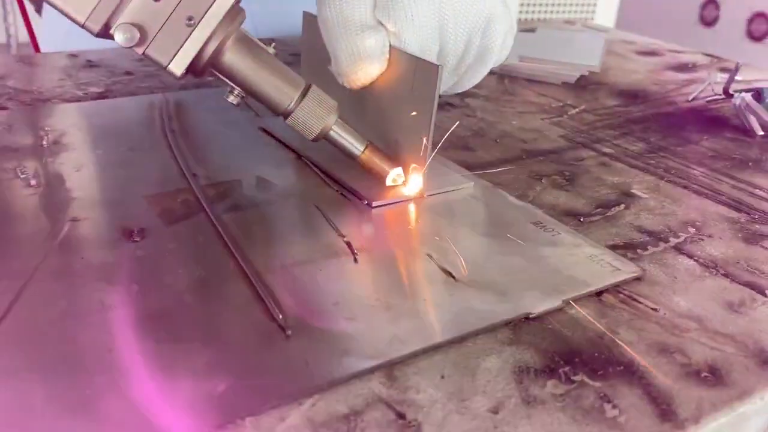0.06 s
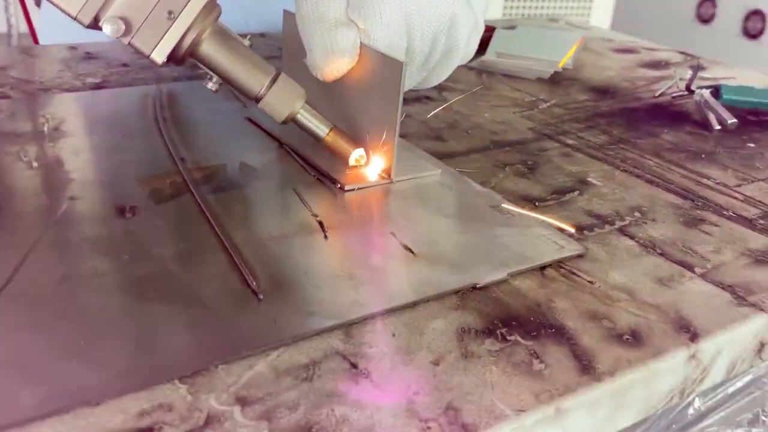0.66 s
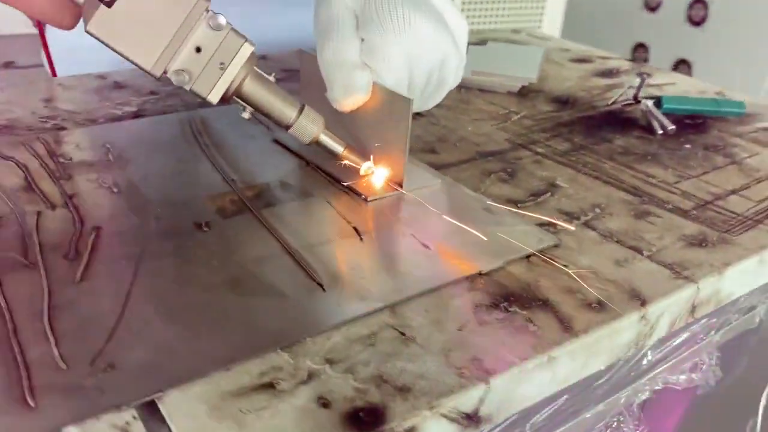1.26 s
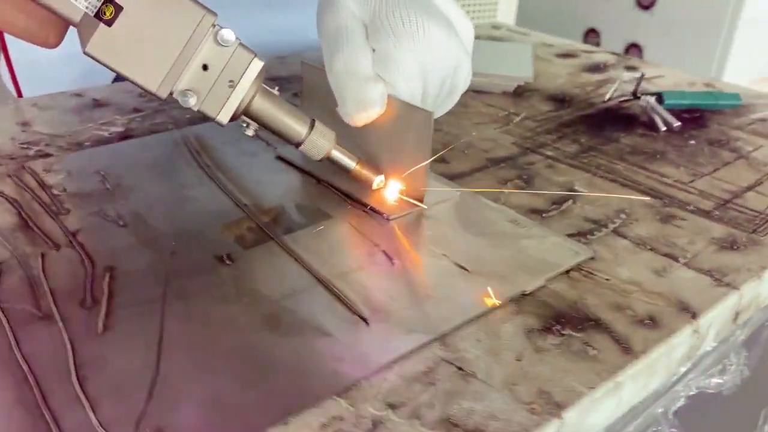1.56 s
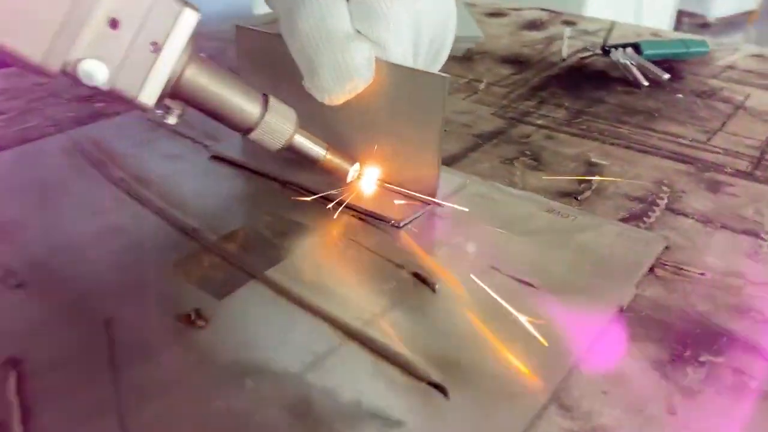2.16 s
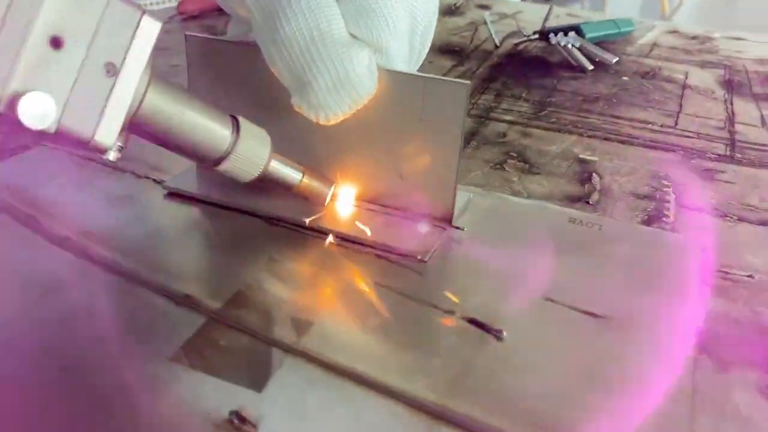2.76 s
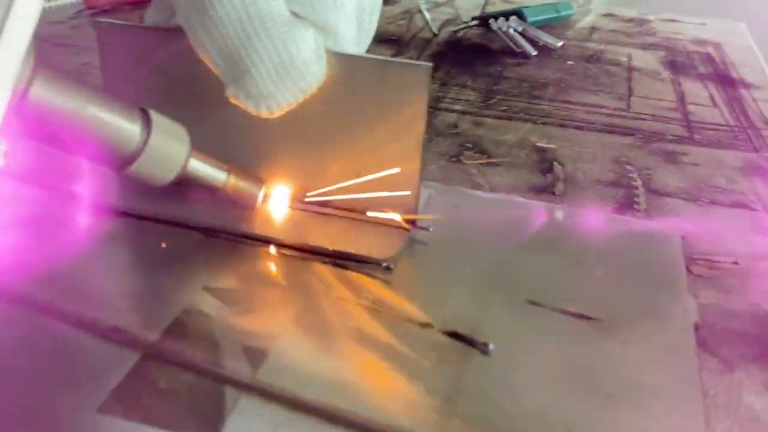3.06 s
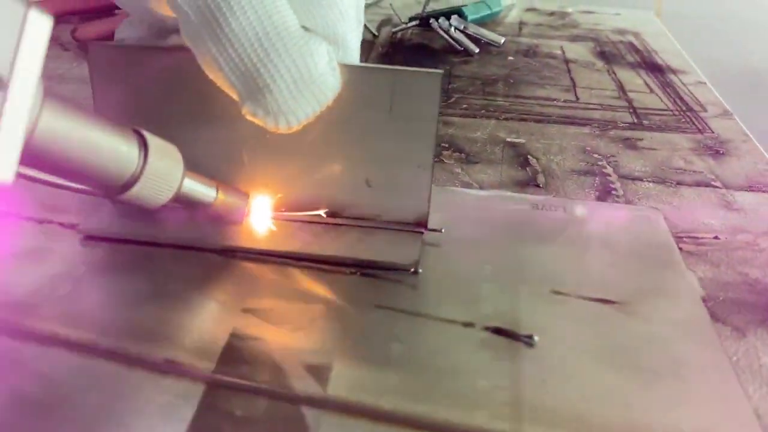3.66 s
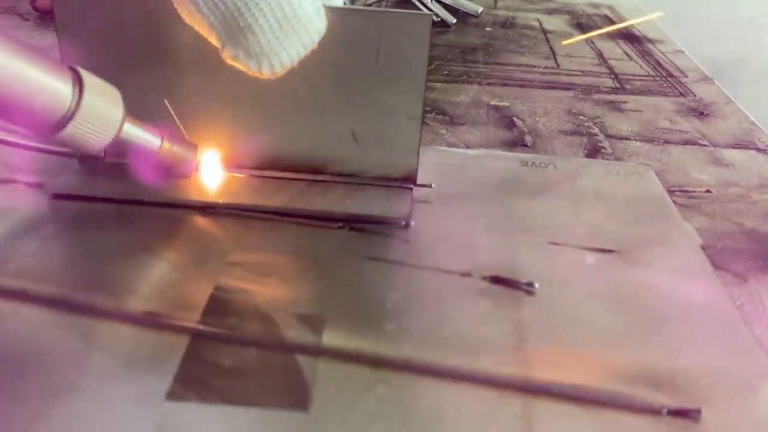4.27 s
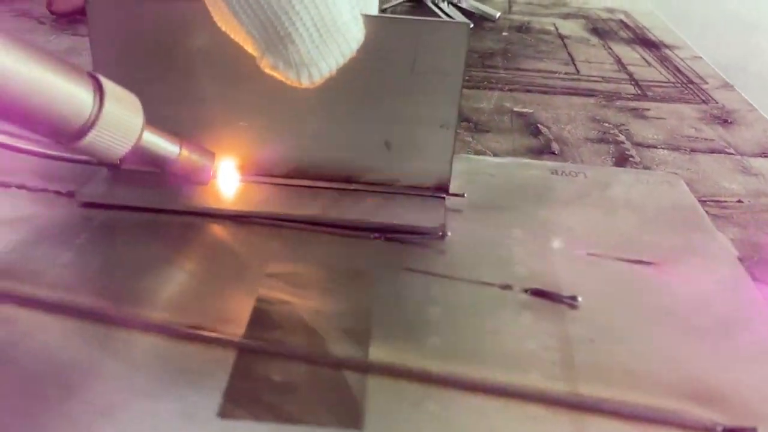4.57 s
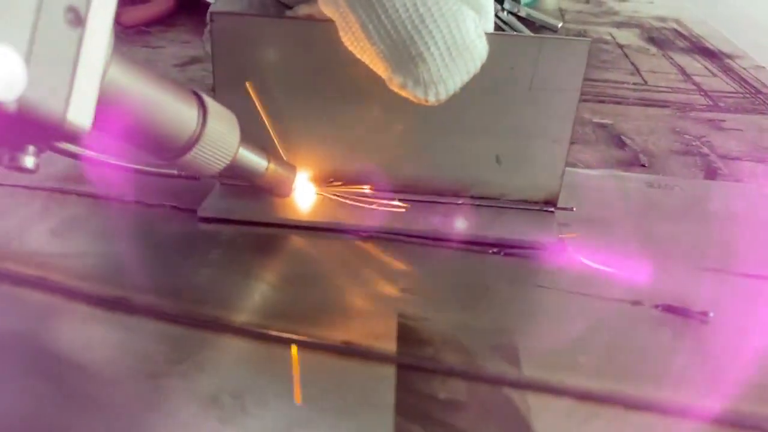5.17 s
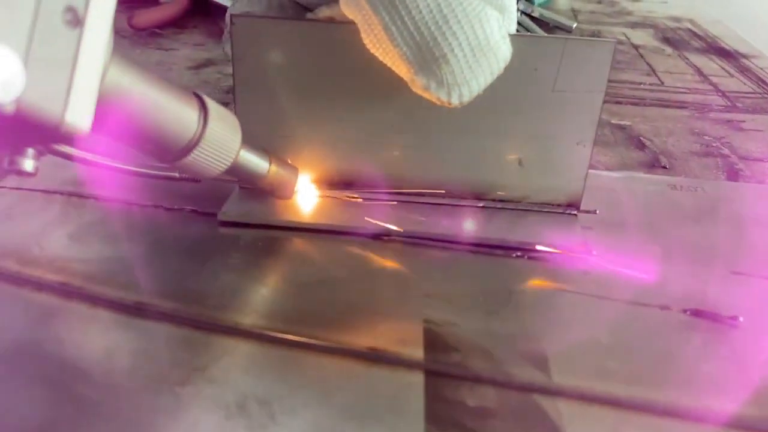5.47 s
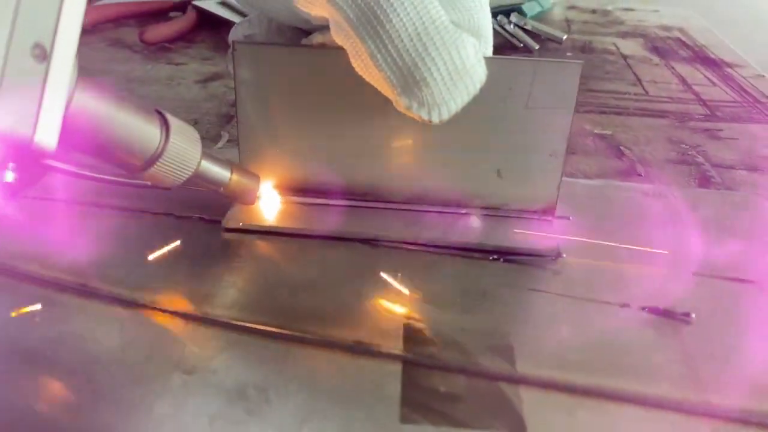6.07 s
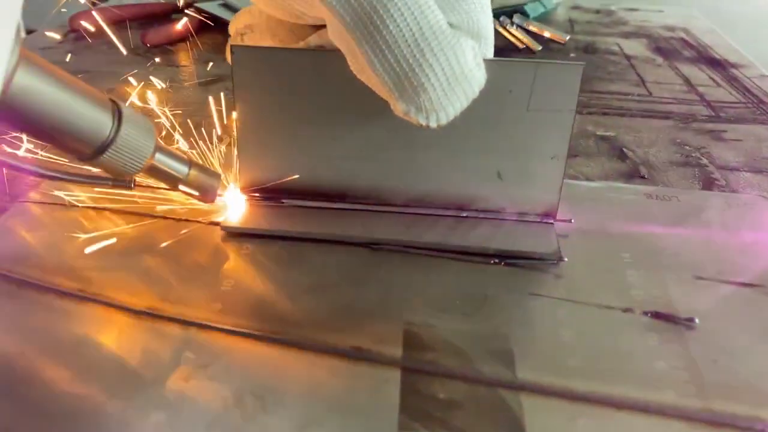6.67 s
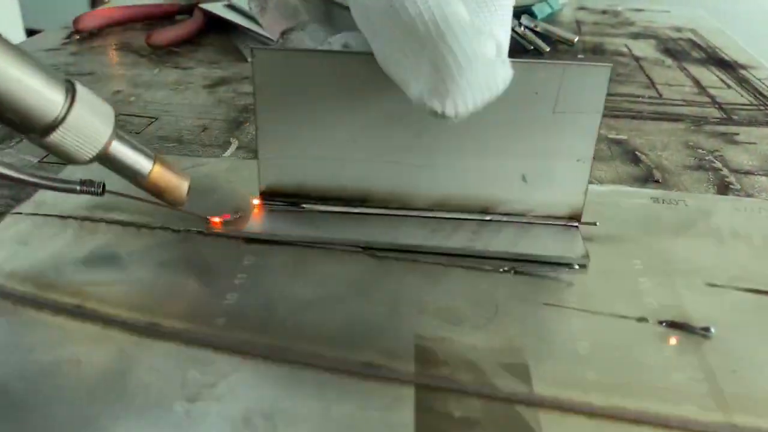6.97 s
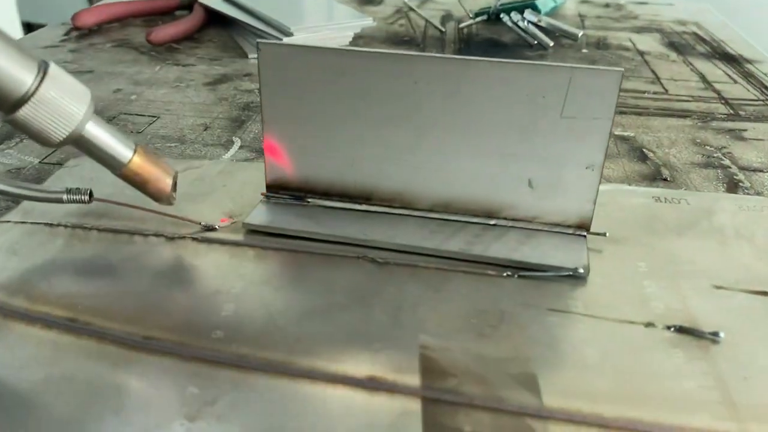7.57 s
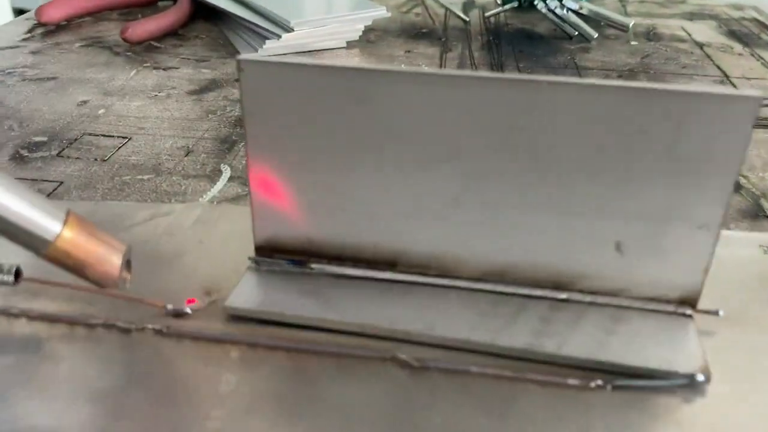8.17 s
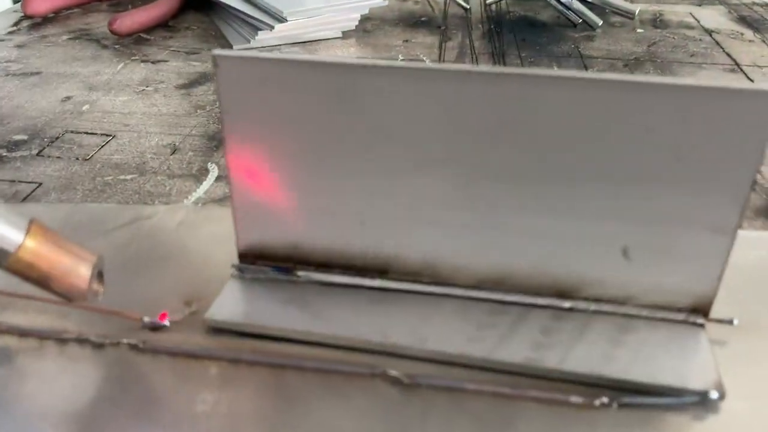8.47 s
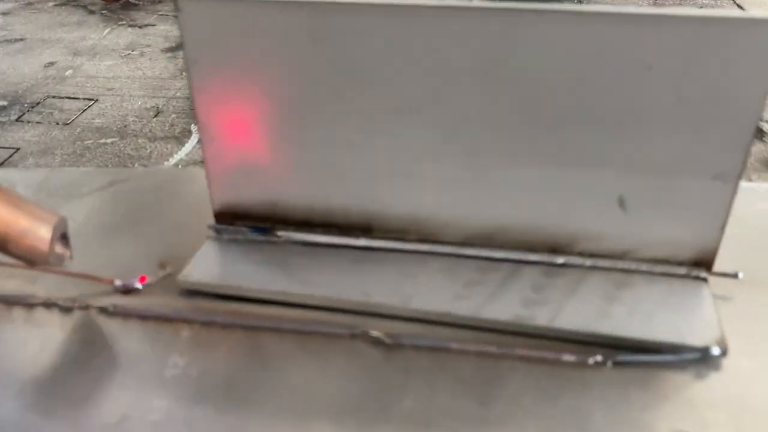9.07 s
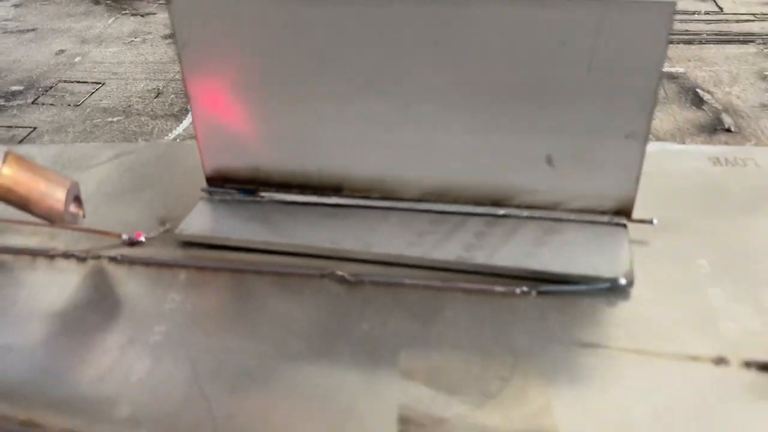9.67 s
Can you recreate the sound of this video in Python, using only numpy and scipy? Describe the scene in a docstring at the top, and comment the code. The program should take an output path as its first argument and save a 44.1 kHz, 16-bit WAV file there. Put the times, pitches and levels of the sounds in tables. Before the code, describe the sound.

From the first moment a handheld laser torch is welding a steel joint, close to the microphone and a little to the left. It gives a high, piercing whine with a fast, raspy buzz and a bright sizzling hiss, all wavering slightly as the hand moves. A drop of melt pops right at the start, and two more pop at about 6.6 and 6.9 seconds. At 7 seconds the welding cuts off and the trigger clacks back with a tiny rattle. Shielding gas hisses on for about half a second and dies away. From around 8 seconds the resting welder gives a faint, very high whistle until the end, near 10 seconds. Throughout, workshop fans and motors make a low rumble and hum, and a machine further off thuds dully about every 1.3 seconds. This background is most exposed once the welding stops.

```python
"""A handheld laser torch welds a steel corner joint on a metal table. The laser fires 3500 times a
second and sweeps across the seam: the vapour plume whines, hisses and buzzes, and a few drops of melt pop.
The beam stops at 7 s, the trigger clacks back and the shielding gas runs on for half a second.
The resting welder whistles faintly; workshop machines rumble and thump throughout."""
import sys
import numpy as np
from scipy import signal
from scipy.fft import rfft, irfft, next_fast_len
from scipy.io import wavfile
from scipy.ndimage import map_coordinates

SR = 44100
rng = np.random.default_rng(int(sys.argv[2]) if len(sys.argv) > 2 else 0)


def persist_wave(psi):
    """Save psi, clipped to +-1, as 16-bit WAV."""
    counts = np.round(np.clip(psi, -1, 1) * 32767).astype(np.int16)
    wavfile.write(sys.argv[1], SR, np.atleast_2d(counts).T)


N = 437031

PULSE_HZ, SWEEP_HZ = 3500.1, 107.86
SEAM_END_S, BEAM_OFF_S = 6.89, 7.0
EXIT_CYCLES = 0.1708  # where in each sweep the beam leaves the joint

# Each row: time in seconds, level of the weaker half sweep in dB. It rises as both plates get covered.
AIM = [(0, -11), (1.3, -7.5), (2.5, -6), (3.5, -1.5), (4.5, -2.5), (5.5, 4.5), (7, 7.5)]
# Harmonics 1 to 4 as the hand moves. Each row: time in seconds, level in dB.
FIRST_LEVEL = [(0.0, -46), (0.06, -44), (0.17, -58), (0.23, -49), (1.01, -53.5), (2.21, -47.5), (2.99, -53),
               (3.19, -49), (4.65, -45.5), (5.83, -45.5), (6.71, -51.5), (6.98, -57)]
SECOND_LEVEL = [(0.0, -32), (0.17, -38.5), (0.82, -40), (1.03, -44.5), (1.34, -38.5), (1.67, -47),
                (2.23, -34), (2.97, -35.5), (3.6, -51), (3.98, -44), (4.12, -60), (4.7, -51), (5.31, -38),
                (5.99, -37.5), (6.67, -44), (6.98, -54)]
THIRD_LEVEL = [(0.0, -37.5), (0.76, -47), (0.97, -33.5), (1.75, -34), (2.16, -30.5), (2.43, -36.5),
               (2.76, -36.5), (3.52, -37.5), (4.43, -31.5), (5.21, -35.5), (5.58, -34.5), (6.55, -37),
               (6.75, -42), (6.78, -38), (6.92, -40.5), (6.98, -47)]
FOURTH_LEVEL = [(0.0, -32.5), (0.82, -40.5), (1.2, -33.5), (1.96, -39), (2.08, -34.5), (2.57, -35),
                (2.62, -28), (3.24, -36), (3.54, -32.5), (4.37, -35), (4.43, -33), (4.94, -38), (5.85, -30),
                (5.95, -44), (6.08, -34), (6.78, -45), (6.88, -34), (6.98, -48)]
# Each row: a harmonic's gain in dB, left-right pan in dB, pan in dB per dB of aim, reflection in dB.
HARMONIC_MIX = [(0, 24.5, 2, -53), (0, 2.5, 1, -48.5), (0, 0, 0, -46), (0, 0.5, 0, -48.5)]
# Each row: a harmonic's phase lag in the joint in radians, phase lean in radians, then as shares of
# the boiling in the joint: floor, rebound, second plate, extra on that plate at full aim.
HARMONIC_BOILING = [(.4, .45, .07, .03, -.12, .22), (.45, .05, .06, .18, .02, .24),
                    (.8, -.2, .06, .32, .24, .14), (.55, -.15, .13, .3, .6, .02)]


def whine(flutter_db=0.05, jitter_rad=0.14, kick_rad=0.26, roam_rad=0.15, early_cycles=0.017):
    """Every laser pulse puffs the plume; the sweep's abrupt edges put wide sidebands on each harmonic."""
    aim_db, = curves(AIM)
    _, stay, _ = curves(BUZZ_PATH)
    # metal boils hard in the joint, rebounds, sputters on the second plate, simmers on the way back
    rebound = lobe(0.27, 0.083)
    sputter = lobe(0.6, 0.19) * amp(wobble(400))
    simmer = 0.33 * lobe(0.81, 0.14)
    flutter = amp(flutter_db * wobble(130))
    tremble = jitter_rad * wobble(260)
    edge_kick = kick_rad * dwell(EXIT_CYCLES, 0.068, rise=0.018, fall=0.033)
    swing = np.sin(2 * np.pi * sweep())
    levels = FIRST_LEVEL, SECOND_LEVEL, THIRD_LEVEL, FOURTH_LEVEL
    out = np.zeros((2, N))
    for k, (level, mix, boiling) in enumerate(zip(levels, HARMONIC_MIX, HARMONIC_BOILING), 1):
        gain_db, pan_db, pan_per_aim, reflection_db = mix
        lag_rad, lean_rad, floor, rebound_share, plate_share, aimed_share = boiling
        in_joint = dwell(EXIT_CYCLES - stay - early_cycles * k, stay, rise=0.04, fall=0.02 * np.sqrt(k))
        on_plate = (plate_share + aimed_share * amp(aim_db)) * sputter
        swell = floor + in_joint + rebound_share * rebound + on_plate + simmer * (1 - 1 / k)
        tilt = (lean_rad + roam_rad * wobble(1.18)) * swing  # the moving hand reshapes the sidebands
        bend = tremble - lag_rad * in_joint + edge_kick / k + tilt + 0.5 * wobble(4)
        phase = 2 * np.pi * k * PULSE_HZ * clock() + bend
        direct = envelope(level, gain_db) * sides(pan_db + pan_per_aim * aim_db) * np.sin(phase)
        # reflections off the plates stay when the direct tone fades
        reflected = amp(reflection_db + 1.5 * wobble(2) - 100 * since(SEAM_END_S)) * np.cos(phase)
        out += np.sqrt(2) * swell / swell.mean() * (direct + np.array([reflected, -reflected]))
    return flutter * out


def beam(fade_s=0.012, linger_db=-12, t60_s=0.288):
    """Gain of 1 while the laser fires, then a quick drop and a short decay in the room."""
    room_tail = amp(linger_db - 60 * since(BEAM_OFF_S) / t60_s)
    return np.maximum(1 - crossfade(BEAM_OFF_S, fade_s), room_tail)


def sweep(sag_hz=14, settle_s=0.21):
    """The beam's position in cycles; the sweep starts slow and comes up to speed."""
    return clock() * SWEEP_HZ + sag_hz * settle_s * np.exp(-clock() / settle_s)


def lobe(centre, width):
    """A flat-topped swell once a sweep; centre and width in cycles."""
    offset = (sweep() - centre + 0.5) % 1 - 0.5
    return 1 / (1 + (offset / width) ** 4)


def dwell(start, length, rise, fall):
    """A soft-edged gate once a sweep; all in cycles."""
    offset = (sweep() - start - length / 2 + 0.5) % 1 - 0.5
    opening = (1 + np.tanh((offset + length / 2) / rise)) / 2
    closing = (1 - np.tanh((offset - length / 2) / fall)) / 2
    return opening * closing


# The plume's four bands, low to high. Each row: frequency in Hz, spectral density in dB.
RUSH_SPECTRUM = [(400, -29), (900, -19), (1900, -5.5), (2200, 0), (2500, 0), (3200, 3), (3700, 4),
                 (4100, -8.5), (5000, -35)]
HISS_SPECTRUM = [(3700, -21.5), (4200, 0.5), (4850, 1.5), (5300, 1.5), (5900, -1), (6500, 4), (7300, 1.5),
                 (8300, -26.5), (9500, -39)]
FIZZ_SPECTRUM = [(6800, -33.5), (7400, -1), (7900, -1), (8350, -13), (8900, 3.5), (9400, -2), (10100, 2),
                 (10700, -1), (11200, 0), (11600, -3), (12000, -20), (12800, -26.5)]
SIZZLE_SPECTRUM = [(11300, -38), (12100, -22), (12600, -11.5), (13100, -7.5), (13600, -7.5), (14100, -7),
                   (14700, -2), (15300, -5.5), (15800, -2.5), (16500, -30.5)]
# The same bands over time. Each row: time in seconds, relative level in dB.
RUSH_LEVEL = [(0.0, -41.5), (1.05, -48.5), (2.15, -43), (3.08, -45), (3.14, -44), (4.57, -40), (6.12, -48),
              (6.88, -48), (6.96, -53.5)]
HISS_LEVEL = [(0.0, -38), (0.6, -41), (1.2, -45), (1.35, -42.5), (1.72, -46), (2.15, -38), (2.7, -41),
              (3.3, -40.5), (4.13, -41), (4.42, -43), (5.08, -40.5), (6.36, -41), (6.84, -48),
              (6.96, -52.5)]
FIZZ_LEVEL = [(0.0, -36), (0.11, -35), (1.14, -37), (1.73, -39.5), (2.1, -34), (2.78, -37), (2.84, -34),
              (2.9, -40), (3.71, -39), (3.77, -39), (4.29, -38.5), (4.51, -36), (5.54, -47), (6.28, -44),
              (6.86, -48), (6.98, -50.5)]
SIZZLE_LEVEL = [(0.0, -31.5), (0.08, -26), (0.15, -33.5), (0.46, -31.5), (1.12, -41), (1.38, -36),
                (1.7, -36), (2.09, -32), (2.54, -37.5), (2.66, -37), (3.14, -37.5), (3.91, -35.5),
                (4.23, -38.5), (4.52, -36.5), (4.96, -36.5), (5.62, -37), (6.86, -41.5), (6.96, -52)]
# Noise at the torch. Each row: frequency in Hz, left-right correlation.
TORCH_COHERENCE = [(700, 0.33), (1400, .05), (3300, 0.12), (4300, 0.75), (6000, 0.41), (8000, 1),
                   (10000, 0.99), (15000, 1)]


def plume(spit_db=0.86, surge_db=1.5):
    """Turbulent vapour, released in bursts by the sweep."""
    spit = amp(spit_db * wobble(220))
    bursts = 0.6 + 0.28 * lobe(0.16, 0.043) + 0.32 * lobe(0.89, 0.16) + 0.75 * lobe(0.6, 0.1)
    # the low bands are steadier, but crack where the beam leaves the joint
    flares = 1 + 1.5 * lobe(0.19, 0.03) + 0.42 * lobe(0.64, 0.11) + 0.35 * lobe(0.733, 0.08)
    sputter = lobe(0.56, 0.11) * amp(wobble(90))
    spurts = 0.42 + 0.37 * lobe(0.17, 0.038) + 0.25 * lobe(0.87, 0.14) + 0.79 * sputter
    rush = envelope(RUSH_LEVEL, gain_db=-5.5) * noise(RUSH_SPECTRUM, TORCH_COHERENCE)
    hiss = envelope(HISS_LEVEL, gain_db=3) * noise(HISS_SPECTRUM, TORCH_COHERENCE)
    fizz = envelope(FIZZ_LEVEL, gain_db=4.5) * noise(FIZZ_SPECTRUM, TORCH_COHERENCE)
    surge = amp(surge_db * wobble(6.5))
    sizzle = envelope(SIZZLE_LEVEL, gain_db=5.5) * surge * noise(SIZZLE_SPECTRUM, TORCH_COHERENCE)
    return (rush + hiss) * unit(flares * spit) + fizz * unit(bursts * spit) + sizzle * unit(spurts * spit)


def table_echo(x, gain=0.2, delay_s=0.000322, roam=0.26):
    """The steel table returns a close copy; its delay drifts with the hand, so the colour shifts."""
    delayed_index = np.arange(N) - SR * delay_s * np.exp(roam * wobble(1.1))
    return np.array([side + gain * map_coordinates(side, [delayed_index]) for side in x])


# The buzz as the hand steers. Each row: time in seconds, relative level in dB, stay in the joint in
# cycles, second plate's click in dB.
BUZZ_PATH = [(0, -46.5, 0.22, -19), (0.5, -51.5, 0.26, -17.5), (1.6, -53.5, 0.24, -10.5),
             (2.6, -46.5, 0.26, -22.5), (3.9, -48, 0.22, -13.5), (5.2, -45, 0.22, -11),
             (6.0, -45.5, 0.213, -3.5), (6.4, -48, 0.22, -7), (6.62, -50.5, 0.21, -6.5),
             (6.85, -60, 0.2, -3)]
# A click with the beam off centre, then centred. Each row: frequency in Hz, gain in dB.
OFF_CENTRE_CLICK = [(150, -19), (320, 6.5), (430, -7), (640, 6.5), (750, 4.5), (850, 1.5), (970, 5),
                    (1170, 3.5), (1500, 1.5), (1950, 6.5), (2250, -1.5), (2800, -0.5), (3900, -14),
                    (4400, -2), (5700, -3), (6500, 0.5), (7600, -2), (8300, -31), (10200, -25.5),
                    (11100, -3.5), (12000, -41)]
CENTRED_CLICK = [(320, 1), (640, 3.5), (750, 3), (850, 11), (970, 0), (1170, 5.5), (1400, -0.5), (1700, -2),
                 (1950, -7), (2250, -2), (2800, 6), (3900, -11), (4400, -3), (5700, -2), (6400, 1.5),
                 (7800, -8), (8300, -38), (10200, -20), (11100, 5), (12000, -40.5)]


def buzz(gain_db=2, entry_db=-1.5, scatter_db=1.16, jitter_cycles=0.001, release_db_per_s=200):
    """The plume clicks as the beam enters the joint, as it leaves, and as it meets the second plate."""
    level_db, stay, plate_db = curves(BUZZ_PATH)
    aim_db, = curves(AIM)
    position = sweep()
    cycles = np.arange(1, int(position[-1]) - 1)
    edges = (EXIT_CYCLES - stay, amp(aim_db / 2 + entry_db)), (EXIT_CYCLES, -1), (0.52, amp(plate_db))
    clicks = np.zeros(N)
    for edge_cycles, size in edges:
        jittered = cycles + rng.normal(0, jitter_cycles, len(cycles))
        at = np.interp(jittered, position - edge_cycles, np.arange(N))[:, None]
        taps = np.abs(at.astype(int) + np.arange(-8, 9))
        strength = amp(rng.normal(0, scatter_db, at.shape))
        impulses = strength * np.sinc(taps - at)  # clicks fall between samples
        clicks += size * np.bincount(taps.ravel(), impulses.ravel(), N)[:N]
    off_centre = signal.fftconvolve(clicks, ringing(OFF_CENTRE_CLICK))[:N]
    centred = signal.fftconvolve(clicks, ringing(CENTRED_CLICK))[:N]
    centring = crossfade(at_s=4.86, width_s=1)
    stereo = left_first((1 - centring) * off_centre + centring * centred)
    return amp(level_db + gain_db - release_db_per_s * since(SEAM_END_S)) * unit(stereo)


def left_first(x, lag_s=0.00028, corner_hz=3000):
    """The sound reaches the left first; the lag shrinks in the treble."""
    half_lag_s = np.array([[lag_s], [-lag_s]]) / 2
    return filtered(x, lambda hz: np.exp(2j * np.pi * hz * half_lag_s / (1 + hz / corner_hz)))


# Each row: frequency in Hz, the left's phase lead in radians from afar, the same from close by.
TREBLE_LEAD = [(3600, -0.5, 0), (3830, -2.5, 2.5), (4830, -3, 2), (5520, 0.5, 1), (6900, 2.5, -2.5),
               (7630, -2, -2), (8340, -1, -3), (9260, -6, -5), (12000, -9, -9.5), (13420, -10.5, -11.5),
               (15840, -15.5, -15.5)]


def treble_skew(x, close_in_s=2.3):
    """Left and right are out of step in the treble; the pattern changes as the listener moves in."""
    hz, *leads = np.transpose(TREBLE_LEAD)
    far, close = (filtered(x[1], lambda f: np.exp(-1j * np.interp(f, hz, lead))) for lead in leads)
    near = crossfade(close_in_s, width_s=0.15)
    return np.array([x[0], (1 - near) * far + near * close])


# Each row: start in seconds, relative level in dB, t60 in seconds.
POPS = [(0.0614, -22.5, 0.082), (6.633, -30, 0.02), (6.8714, -24, 0.047)]
# Each row: frequency in Hz, spectral density in dB.
POP_SPECTRUM = [(300, -15), (900, -0.5), (3200, -5.5), (6000, -4), (10000, -2.5), (16000, -14)]


def spatter(gain_db=-11, rough_db=2.5):
    """Drops of melt burst off the pool."""
    pops = amp(gain_db) * decays(POPS) * noise(POP_SPECTRUM, TORCH_COHERENCE)
    return pops * unit(amp(rough_db * wobble(700)))


# Each row: frequency in Hz, spectral density in dB.
JET_SPECTRUM = [(600, -34.5), (1000, -3), (1370, -3.5), (1700, -7.5), (2700, -5), (4570, -5.5),
                (5400, -11.5), (7600, -2), (10400, -15), (11400, -4), (13300, -10), (16000, -8)]
# Each row: resonance in Hz, width in Hz, lift in dB.
NOZZLE_MODES = [(2180, 210, 9.5), (3260, 220, 5), (6760, 290, 7), (9800, 450, 11), (14300, 900, 6.5)]


def gas(level_db=-47.5, flutter_db=0.96, shut_s=7.42, sag_db_per_s=12, release_db_per_s=71):
    """Shielding gas flows through the hollow nozzle, sags after the beam stops and dies as the valve shuts."""
    def nozzle(hz):
        return amp(sum(db / (1 + (2 * (hz - mode) / width) ** 2) for mode, width, db in NOZZLE_MODES))

    fall_db = sag_db_per_s * since(BEAM_OFF_S) + release_db_per_s * since(shut_s)
    flow = amp(level_db - fall_db + flutter_db * wobble(36))
    return flow * unit(filtered(noise(JET_SPECTRUM, TORCH_COHERENCE), nozzle))


# Each row: start in seconds, level in dB, t60 in seconds.
TRIGGER_CLACKS = [(7.057, -39, 0.081), (7.083, -46, .16), (7.112, -48, .1)]
# Each row: frequency in Hz, spectral density in dB.
HANDLE_SPECTRUM = [(500, -19), (950, -1.5), (1400, -6), (1800, -9), (2400, -7), (4500, -16), (10000, -6),
                   (16000, -16)]


def trigger():
    """The trigger springs back and the torch rattles in the hand."""
    return decays(TRIGGER_CLACKS) * noise(HANDLE_SPECTRUM, TORCH_COHERENCE)


# Each row: start in seconds, end in seconds, first pitch in Hz, last pitch in Hz, level in dB.
GLIDES = [(7.5, 7.972, 13800, 13900, -86), (7.55, 7.783, 14000, 14200, -81)]


def wind_down():
    """Thin whistles rise as the welder winds down."""
    out = np.zeros(N)
    for start_s, end_s, from_hz, to_hz, db in GLIDES:
        progress = np.clip((clock() - start_s) / (end_s - start_s), 0, 1)
        arch = np.sqrt(np.maximum(np.sin(np.pi * progress), 0))
        pitch_hz = from_hz + (to_hz - from_hz) * progress
        out += amp(db) * arch * np.sin(2 * np.pi * np.cumsum(pitch_hz) / SR)
    return np.sqrt(2) * out


# Each row: frequency in Hz, level in dB.
IDLE_TONES = [(14293, -82.5), (14879, -74.5), (15272, -85.5), (15461, -85.5), (15655, -59)]
# Each row: frequency in Hz, spectral density in dB.
IDLE_SPECTRUM = [(12500, -31.5), (13400, -8), (14200, -3), (15700, -4)]


def idle(start_s=8.1, fade_s=0.6, skew_rad=1.3, waver_rad=0.77, fizz_db=-75):
    """The resting welder's electronics whistle and fizz faintly, left and right out of step."""
    skew = np.array([[skew_rad], [-skew_rad]])
    tones = np.zeros((2, N))
    for hz, db in IDLE_TONES:
        gain = np.sqrt(2) * amp(db + 2 * wobble(12))
        tones += gain * np.sin(2 * np.pi * hz * clock() + waver_rad * wobble(70) + skew)
    fizz = amp(fizz_db) * noise(IDLE_SPECTRUM, SHOP_COHERENCE)
    return (tones + fizz) * np.minimum(since(start_s) / fade_s, 1)


# Each row: time in seconds, workshop level in dB.
SHOP_LEVEL = [(0.02, -35.5), (0.21, -40.5), (2.41, -40), (2.66, -43), (6.32, -44.5), (8.49, -41),
              (9.15, -41.5), (9.9, -40.5)]
# Each row: frequency in Hz, spectral density in dB.
RUMBLE_SPECTRUM = [(25, -60), (33, -50), (42, -4), (50, 5), (62, -1), (78, 11.5), (97, 8), (120, -4.5),
                   (170, -54)]
FAN_SPECTRUM = [(80, -24), (125, 3), (235, 1), (265, -1.5), (310, -2), (400, -7), (490, -12), (610, -11),
                (800, -19.5), (1500, -23), (2300, -34), (4500, -45.5), (8000, -56.5), (13000, -71)]
# Each row: frequency in Hz, level in dB.
MACHINE_TONES = [(65, -45.5), (133, -56.5), (242.6, -58), (299.3, -50.5), (342, -57.5)]
# Each row: frequency in Hz, left-right correlation.
SHOP_COHERENCE = [(60, 0.96), (130, 0.96), (290, 0.76), (640, 0.18), (1400, 0.0087), (3100, .2),
                  (7000, 0.24)]


def workshop(surge_db=2.5, waver_db=2.4, waver_rad=0.35):
    """Fans and motors rumble, with a few wavering tones."""
    level_db, = curves(SHOP_LEVEL)
    rumble = amp(bass_db() + surge_db * wobble(6.1)) * noise(RUMBLE_SPECTRUM, SHOP_COHERENCE)
    fans = amp(level_db) * noise(FAN_SPECTRUM, SHOP_COHERENCE)
    hum = np.zeros(N)
    for hz, db in MACHINE_TONES:
        gain = np.sqrt(2) * amp(db + waver_db * wobble(3.3))
        hum += gain * np.sin(2 * np.pi * hz * clock() + waver_rad * wobble(4))
    return rumble + fans + amp(level_db - level_db.mean()) * hum


def bass_db(swing=0.88):
    """The workshop's bass follows the fans' level with a slightly smaller swing."""
    level_db, = curves(SHOP_LEVEL)
    return level_db.mean() + swing * (level_db - level_db.mean())


# Each row: start in seconds, level in dB over the workshop's bass.
MACHINE_STROKES = [(0.619, 13), (1.874, 14.5), (3.15, 10), (4.431, 14), (5.691, 14), (6.959, 11),
                   (8.22, 10.5), (9.478, 13)]
# Each row: frequency in Hz, spectral density in dB.
THUD_SPECTRUM = [(36, -37), (52, 10), (85, 11.5), (110, 6.5), (170, -0.5), (300, -7), (700, -67.5),
                 (2000, -130)]


def strokes(rise_s=0.023, t60_s=0.79):
    """A machine further off thuds at each stroke, and the room booms."""
    swell = np.zeros(N)
    for start_s, db in MACHINE_STROKES:
        age_s = since(start_s)
        swell += amp(db - 60 * age_s / t60_s) * (1 - np.exp(-age_s / rise_s))
    return amp(bass_db()) * swell * noise(THUD_SPECTRUM, SHOP_COHERENCE)


def amp(db):
    """Decibels to gain."""
    return 10 ** (np.asarray(db) / 20)


def unit(x):
    """x at rms 1."""
    return x / np.sqrt(np.mean(x ** 2) + 1e-20)


def clock():
    """Sample times in seconds."""
    return np.arange(N) / SR


def since(start_s):
    """Seconds since start_s, 0 before it."""
    return np.maximum(clock() - start_s, 0)


def crossfade(at_s, width_s):
    """A smooth step from 0 to 1."""
    return 0.5 + 0.5 * np.tanh((clock() - at_s) / width_s)


def along(points, hz):
    """(Hz, value) points interpolated on a log axis."""
    knots_hz, values = np.transpose(points)
    return np.interp(np.log(hz + 1), np.log(knots_hz + 1), values)


def curves(rows):
    """One value per sample for each column after the time."""
    times_s, *columns = np.transpose(rows)
    return [np.interp(clock(), times_s, column) for column in columns]


def envelope(rows, gain_db):
    """Gain per sample from (seconds, dB) rows."""
    return amp(curves(rows)[0] + gain_db)


def decays(events):
    """A sudden start and an exponential decay for each (seconds, dB, t60) row."""
    return sum(amp(db - 60 * since(s) / t60_s) * (clock() > s) for s, db, t60_s in events)


def wobble(rate_hz):
    """A smooth random curve, rate_hz knots a second."""
    return map_coordinates(rng.standard_normal(int(N * rate_hz / SR) + 4), [clock() * rate_hz])


def filtered(x, response):
    """x through a frequency response."""
    size = next_fast_len(N + 8192)
    return irfft(rfft(x, size) * response(np.fft.rfftfreq(size, 1 / SR)), size)[..., :N]


def sides(pan_db):
    """Left and right gains whose mean is 1."""
    gains = amp([pan_db / 2, -pan_db / 2])
    return gains / gains.mean(0)


def noise(spectrum, coherence):
    """Coloured stereo noise whose mid has rms 1."""
    def colour(hz):
        width = np.tan(np.arccos(np.clip(along(coherence, hz), -1, 1)) / 2)
        return amp(along(spectrum, hz)) * np.array([np.ones_like(hz), width])

    mid, side = filtered(rng.standard_normal((2, N)), colour)
    return np.array([mid + side, mid - side]) / np.std(mid)


def ringing(spectrum, size=4096):
    """The minimum-phase impulse response of (Hz, dB) rows."""
    cepstrum = irfft(np.log(amp(along(spectrum, np.fft.rfftfreq(size, 1 / SR)))))
    cepstrum[1:size // 2] *= 2
    cepstrum[size // 2 + 1:] = 0
    return irfft(np.exp(rfft(cepstrum)))


# Each row: frequency in Hz, left minus right in dB.
WELD_PAN = [(400, 5), (800, 9), (2400, 4), (3300, 11), (4100, -1), (7000, 3), (9000, -0.5)]


def scene():
    """The weld's lower sounds sit to the left; the workshop is all around."""
    weld = beam() * (table_echo(plume()) + buzz()) + spatter() + gas() + trigger()
    weld = treble_skew(filtered(weld, lambda hz: sides(along(WELD_PAN, hz))))
    room = (workshop() + strokes()) * sides(pan_db=0.56)[:, None]
    return weld + beam() * whine() + wind_down() + idle() + room


def record(dry):
    """Brick-wall low-pass at 15850 Hz."""
    return filtered(dry, lambda hz: hz < 15850)


dry = scene()
out = record(dry)
persist_wave(out)
```